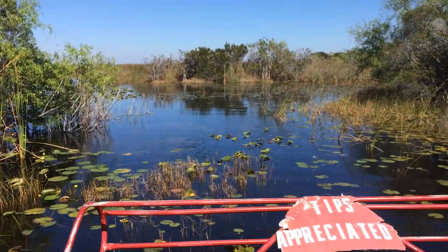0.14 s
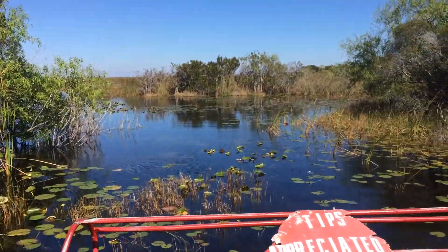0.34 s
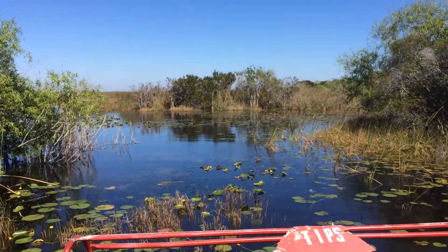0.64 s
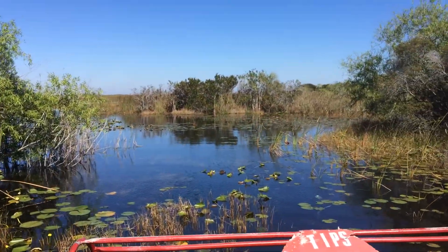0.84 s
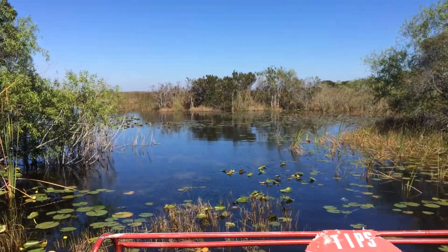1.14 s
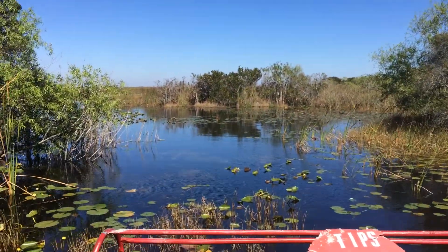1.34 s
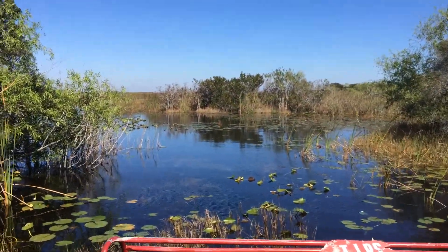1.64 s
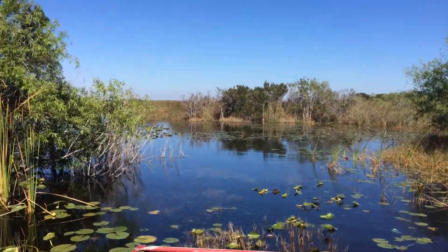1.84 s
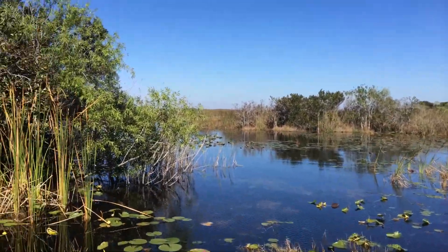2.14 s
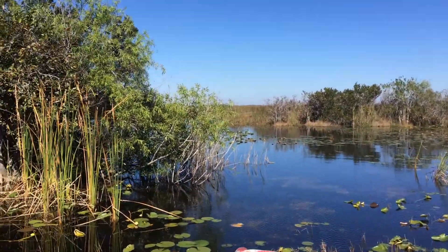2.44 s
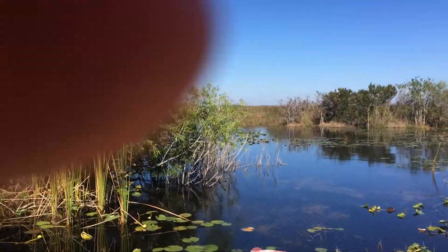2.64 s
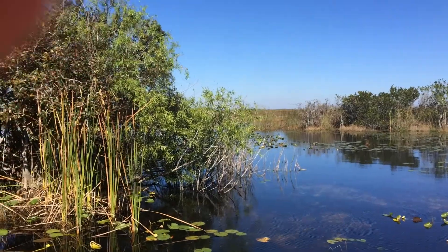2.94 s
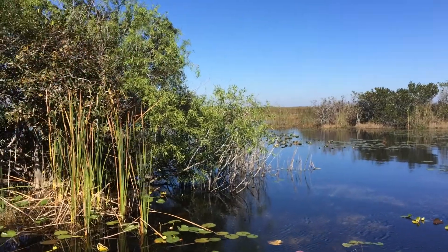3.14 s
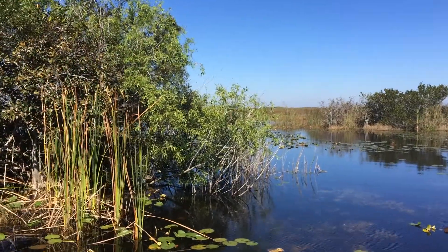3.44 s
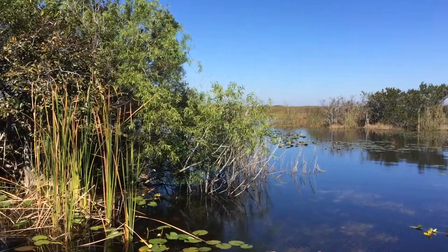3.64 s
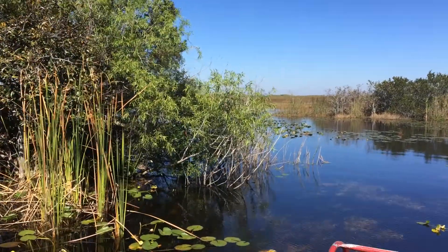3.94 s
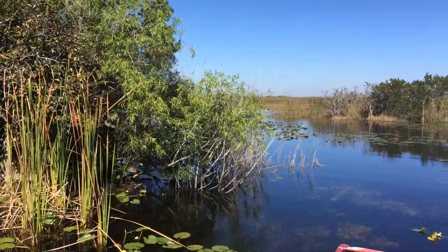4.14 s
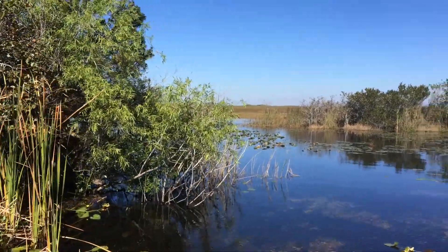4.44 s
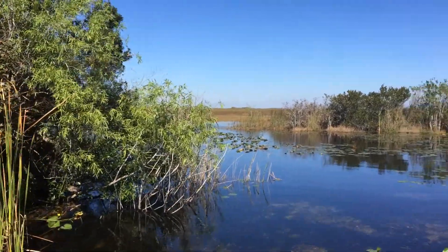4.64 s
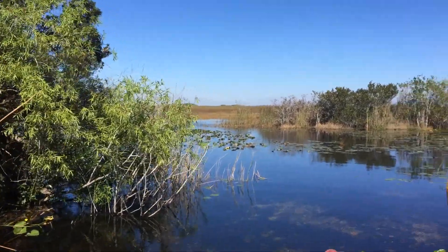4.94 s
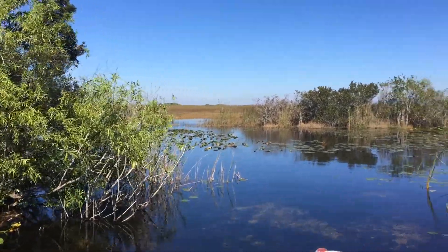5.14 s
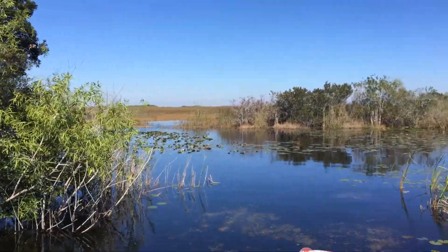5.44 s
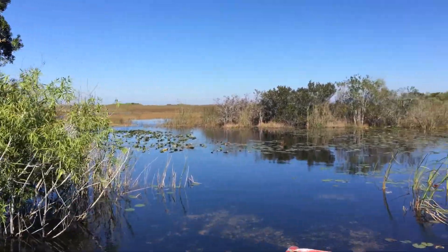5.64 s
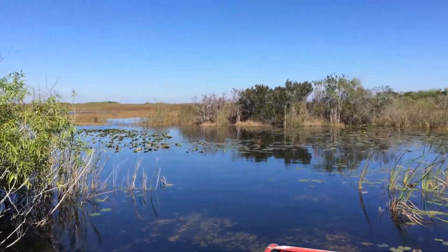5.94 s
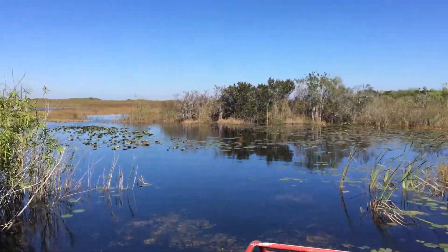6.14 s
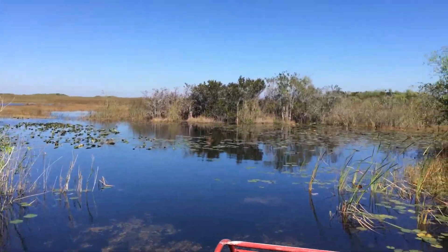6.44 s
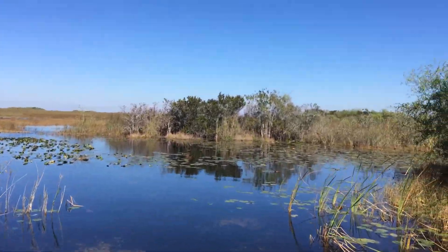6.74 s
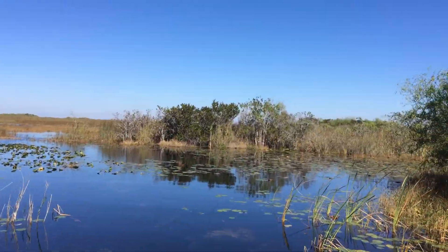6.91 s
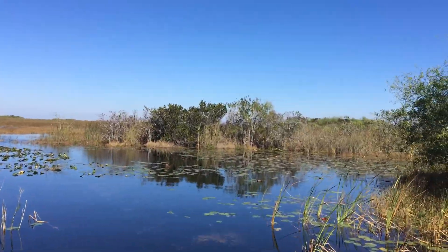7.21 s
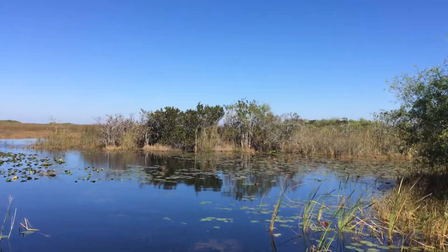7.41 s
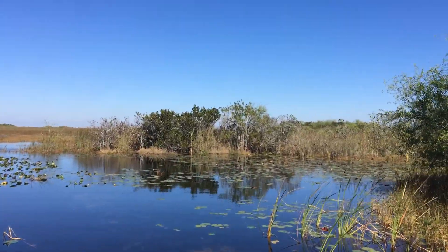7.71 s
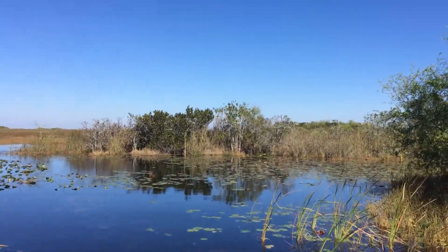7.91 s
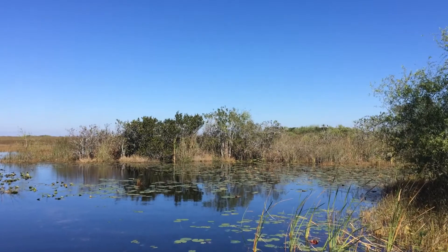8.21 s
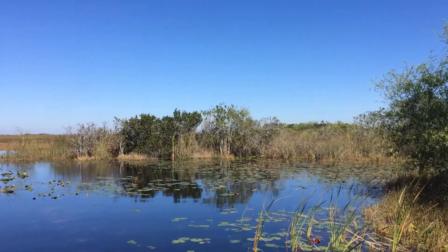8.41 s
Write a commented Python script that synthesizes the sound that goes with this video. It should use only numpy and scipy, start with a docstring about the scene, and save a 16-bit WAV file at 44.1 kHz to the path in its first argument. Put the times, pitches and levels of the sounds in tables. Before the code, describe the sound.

An airboat is heard close up from its deck. For the first two seconds the engine idles with a low, uneven rumble, burbling and putting as it slows slightly, while the metal frame clanks and rattles. At about 2.2 seconds it revs up quickly, and reeds crunch under the hull until about 3 seconds. A deep shudder swells as the propeller bites, and the sound becomes a loud, throbbing drone with rasping exhaust and a hissing wash of air. The pitch is highest from about 3.3 to 4 seconds, with a few hard exhaust pops, strongest near 3.8. The engine then eases off until about 6.6 seconds, pulls again with another low heave, and holds a fairly steady drone from 8 seconds to the end. From 5 seconds on, plants swish briefly along the hull, and the frame keeps rattling lightly.

```python
"""Airboat, from the deck

A V8 lopes at idle, revs up, eases off and pulls again. Its firings boom in the pipes, and the
exhaust gas chuffs and rasps once a turn. The two-blade propeller throbs and pushes a hissing wash
of air. The shaking metal frame clanks, most clearly at idle; reeds crunch and swish along the hull."""
import sys
import numpy as np
from scipy import signal
from scipy.fft import next_fast_len
from scipy.io import wavfile
from scipy.ndimage import uniform_filter1d

SR = 44100
rng = np.random.default_rng(int(sys.argv[2]) if len(sys.argv) > 2 else 0)


def output_pcm(signal):
    """Save a mono or channel-first signal as 16-bit PCM at the path in sys.argv[1].

    Samples are clipped to [-1, 1] before scaling.
    """
    pcm = np.clip(np.atleast_2d(signal).T, -1, 1) * 32767
    wavfile.write(sys.argv[1], SR, np.round(pcm).astype(np.int16))


N = 377937
TIME = np.arange(N) / SR

# crank speed: t/s, speed/(turns/s)
CRANK_SPEED = [(0, 16.4), (.4, 16.3), (.8, 13.25), (2.12, 12.8), (2.3, 16.5), (2.6, 20.7), (2.8, 24.74),
               (3, 28.62), (3.3, 31.47), (3.6, 30.46), (4, 30.7), (4.3, 28.76), (4.6, 28.24), (5, 25.92),
               (5.4, 23.61), (6, 21.6), (6.6, 21.3), (7.05, 23.77), (7.5, 24.4), (7.95, 26.06),
               (8.25, 25.68), (8.57, 24.9)]
# cylinder strengths in firing order: level/dB
CYLINDERS_DB = [-8, -10, -9, -10, -3.5, -8, -7.5, -8]
# drone partials ahead of the pipe EQ: multiple of crank speed, level at cruise/dB, slope/(dB/doubling)
DRONE_PARTIALS = [(2.75, -5, 0), (4.75, -5, -3), (5, -6, 19), (5.25, -7, 8), (5.5, -6, 9), (8, -2.5, 8),
                  (9, -1, 0), (10, -2, -2), (11, 0, 4), (12, 1, 5), (14, 0, 20)]
# firing notes at 6 and 7 times crank speed, at full load: t/s, sixth level/dB, seventh level/dB
FIRING_NOTES = [(2.4, -40, -42), (3.05, -31, -44), (3.35, -31, -41), (3.9, -22.5, -32), (4.3, -24.5, -35),
                (4.9, -26, -36), (5.5, -29, -31), (6.3, -35, -31), (6.8, -28, -25.5), (7.1, -27, -26.5),
                (7.35, -29, -33), (7.8, -22.5, -26), (8.57, -22, -28.5)]
# fader ride on the rasp as the throttle opens: t/s, gain/dB
RASP_RIDE = [(2.8, -1), (3.3, 0.5), (3.9, 1), (4.3, -0.5), (4.7, -1.5), (5.8, -1.5), (6.8, -1)]
# rising burbles at idle: start/s, end/s, level/dB
BURBLES = [(0.066, 0.23, -26), (0.402, 0.512, -27.5), (0.878, 1.067, -24), (1.164, 1.41, -24.5),
           (1.475, 1.584, -23.5), (1.648, 1.826, -24.5), (2.194, 2.3, -23.5)]
# throaty putts at idle: t/s, level/dB
PUTTS = [(.01, -31), (.119, -28), (.18, -30), (.24, -31), (.302, -27.5), (0.361, -29.5), (.49, -38),
         (.555, -36), (.621, -31), (1.134, -39), (1.361, -31), (2.105, -33), (2.408, -27)]
# hard exhaust pops: t/s, rough peak level/dB
POPS = [(2.25, -21), (2.288, -18), (2.969, -19), (3.236, -19), (3.273, -20), (3.332, -19), (3.694, -26),
        (3.79, -13), (3.824, -14), (4.15, -23), (4.57, -23), (4.978, -22), (6.786, -27)]
# hull heaves as the propeller bites: t/s, length/s, level/dB
HEAVES = [(2.748, 0.75, -18.5), (6.716, 0.67, -22)]
# ringing modes of the metal frame: f/Hz, level/dB, t60/s
FRAME_MODES = [(660, -3, .09), (1180, -1, .08), (1250, -6, .06), (1480, -3, .07), (1630, -3, .07),
               (1783, 0, .1), (1890, -2, .08), (2240, -6, .05), (2500, -3, .06), (2750, -6, .05),
               (3390, -4, .04), (3750, -4, .04), (4100, -3, .04), (4450, -3, .04), (4720, -5, .04),
               (5350, -10, .04)]
# frame hits: t/s, clunk level/dB, clunk f/Hz, clack level/dB, clack f/Hz, tinkle level/dB
CLANKS = [(0.119, -47, 2020, -44.0, 4100, -55), (0.298, -46.5, 1450, -53, 2990, -67),
          (0.359, -50, 1630, -47.5, 3680, -60), (0.619, -41.5, 1510, -40, 3470, -50),
          (0.654, -45.5, 1520, -51, 3280, -59), (0.724, -43.5, 1510, -44.5, 2400, -51),
          (0.794, -40.5, 1440, -40.5, 2780, -48), (0.866, -46, 1730, -46, 4650, -51),
          (0.901, -40.5, 1920, -39.5, 3330, -50.5), (1.052, -49, 1610, -50.5, 3130, -55),
          (1.13, -48, 1440, -47, 3100, -52), (1.213, -40.5, 1460, -43.5, 3590, -50),
          (1.249, -37, 1920, -34.0, 2494, -47), (1.289, -50.5, 1740, -43.5, 4540, -49.5),
          (1.362, -43, 1960, -46.5, 2980, -49.5), (1.471, -47, 1820, -42.5, 3950, -49),
          (1.506, -35, 1760, -38.5, 2580, -46), (1.611, -38.5, 1430, -34.5, 2500, -45),
          (1.654, -45, 1340, -45, 3070, -53.5), (1.802, -42.5, 1440, -36, 2535, -44.5),
          (1.838, -38.5, 1645, -40.5, 2540, -51), (1.96, -47.0, 1800, -50, 2930, -54),
          (2.078, -49, 1890, -49, 2900, -52), (2.151, -34.5, 1260, -44.5, 2960, -49),
          (2.221, -47, 1310, -38, 4730, -49), (2.256, -45, 1970, -42, 3050, -47),
          (2.285, -32, 1170, -42, 3500, -50), (2.309, -35, 1170, -47, 3630, -44.5),
          (2.362, -39, 1170, -35.5, 4660, -47), (2.444, -39, 1180, -42, 2730, -47),
          (2.517, -36.5, 1200, -45, 3030, -51), (2.565, -34.5, 1650, -42, 4350, -51),
          (2.705, -40, 1730, -47.5, 2300, -55.5), (2.744, -40, 1770, -43, 2610, -53),
          (2.843, -34, 1200, -48, 2690, -54), (2.902, -41, 1360, -42, 2280, -60),
          (3.04, -44, 1770, -46, 2450, -60), (3.128, -40, 1170, -56, 3240, -61),
          (3.178, -50, 1360, -47, 4200, -60), (3.257, -46, 1630, -46, 2480, -56),
          (3.303, -50, 1480, -43.5, 2450, -55), (3.39, -36.5, 1130, -57, 2550, -60),
          (3.432, -54, 1630, -45.5, 4180, -56), (3.56, -43.5, 1640, -45, 3670, -57),
          (3.691, -44, 1770, -42, 3570, -53), (3.824, -42, 1250, -44.5, 3410, -56),
          (4.09, -50.5, 1460, -45.5, 3500, -56.5), (4.412, -50, 1240, -46, 3870, -58.0),
          (4.642, -44.5, 1130, -43, 4080, -61), (4.884, -42.5, 1770, -46.0, 2600, -63),
          (4.944, -43, 1150, -44.5, 2590, -53), (4.999, -42.5, 1160, -45, 4370, -55),
          (5.255, -50, 1780, -48, 4260, -62), (5.426, -40.5, 1760, -46, 2420, -60),
          (5.618, -41, 1510, -42.5, 2360, -50), (5.771, -42.5, 1430, -39, 3620, -51),
          (6.024, -46, 1600, -42.5, 4530, -49.5), (6.14, -38, 1800, -40, 4200, -50),
          (6.323, -40.5, 1690, -39.5, 4300, -48.5), (6.704, -37.5, 1660, -39, 3200, -53),
          (6.821, -45, 1130, -43.5, 2580, -52), (6.884, -42, 1770, -44, 2200, -49),
          (7.322, -45, 1460, -46, 3570, -58.5), (7.38, -42.5, 1390, -43, 3900, -58),
          (7.544, -46.5, 1760, -45.5, 4000, -51), (7.707, -41.5, 1120, -42, 4100, -54),
          (7.865, -46, 1410, -45, 3800, -59.0), (8.171, -51, 1400, -42.5, 3700, -51),
          (8.328, -45, 1460, -43.5, 4080, -54), (8.485, -45.5, 1420, -45.5, 2500, -54)]
# loose tubes rubbing: centre/s, length/s, f/Hz, level/dB
RUBS = [(5.268, 0.032, 1795, -42.5), (6.82, 0.18, 1800, -44)]
# reeds crushed as the boat sets off: t/s, length/s, level/dB
CRUNCHES = [(2.186, .03, -39.5), (2.215, 0.036, -37), (2.257, 0.094, -38.5), (2.359, 0.035, -32),
            (2.414, .09, -38), (2.547, 0.055, -37), (2.6, 0.16, -44.5), (2.741, 0.055, -37.5),
            (2.793, .08, -41.5), (2.897, 0.054, -40.5)]
# spray and reeds along the hull: centre/s, length/s, level/dB
SWISHES = [(4.96, 0.12, -52), (5.452, 0.08, -48), (5.754, 0.14, -49), (6.152, 0.16, -44.5),
           (6.714, 0.14, -47), (7.096, 0.11, -45), (7.404, 0.069, -43.5), (7.728, 0.089, -43.5),
           (8.02, 0.11, -46.5), (8.36, 0.096, -47.5)]

# EQ curves of the exhaust: f/Hz, level/dB
PIPE_EQ = [(40, -30), (70, -12), (95, -4), (113, -1.5), (130, -3.5), (148, 0), (165, 0), (180, -2.5),
           (205, -13), (250, -19), (310, -24), (390, -35), (900, -70), (2500, -110)]
CHUFF_EQ = [(130, -23), (230, 0.5), (310, 0.5), (390, -13), (550, -14), (1500, -83.5)]
RASP_EQ = [(280, -21.5), (400, -2.5), (480, 3.5), (600, 9), (700, -1), (850, -17.5), (1300, -17),
           (3000, -52), (9000, -94)]
THROAT_EQ = [(50, -31), (100, 3), (150, -4.5), (200, 3), (250, 4.5), (300, -5), (380, -25), (560, -15),
             (680, -16.5), (900, -27), (2000, -60)]
# EQ curves of the air wash: f/Hz, level/dB
ROAR_EQ = [(300, 3.5), (700, 5.5), (1000, 2.5), (1180, 2), (1400, 0), (1800, -0.5), (2200, -5.5),
           (3000, -13.5), (4400, -16.5), (6000, -19.5), (12000, -20.5)]
HISS_EQ = [(1200, -6), (3000, 1), (4500, 2.5), (5500, -2), (6600, -1), (8000, -4), (11000, -7),
           (13000, -16), (15000, -22)]
FIZZ_EQ = [(4000, -44), (8000, -6), (11500, 9), (15000, -9)]
# EQ curves of a clank's low, middle and top registers: f/Hz, level/dB
CLUNK_EQ = [(300, -18), (680, 1.5), (900, -5.5), (1200, -8), (1900, -4.5), (2300, -14.5), (5000, -49.5)]
CLACK_EQ = [(1500, -25.5), (2300, -2.5), (3300, 1), (4600, -1), (5400, -8), (8000, -37)]
TINKLE_EQ = [(4000, -23.5), (5800, 2.5), (7000, 1), (9000, -6), (15000, -14.5)]
# EQ curves of the shuddering hull and the breaking reeds: f/Hz, level/dB
HULL_EQ = [(10, -60), (28, -30), (36, -16), (44, 0), (55, -3), (72, -8), (100, -8.5), (170, -40),
           (600, -100)]
REEDS_EQ = [(700, -14), (1200, -1), (1900, 1.5), (2600, -0.5), (3400, -2), (4600, 2.5), (5500, -6.5),
            (7500, -11), (14000, -26)]

IDLE, CRUISE = 13, 25  # turns/s
BITE, BITE_RANGE = 17.48, 6.6  # turns/s: load starts at BITE and is full BITE_RANGE higher
# layer gains: at cruise/dB, slope/(dB/doubling of speed), boost/(dB per unit of surge), random swing/dB
BOOM, DRONE = (-25, 9, 2.5, -0.1), (-27.5, 12, 0, .6)
CHUFF, RASP = (-35.5, 0, 0.5, 1.84), (-42.5, 18, 1, .9)
BLADES, BLADE_OCTAVE, SHUDDER = (-23.5, -5.5, 2, 3.5), (-29, 19, 1.5, 1.8), (-26.5, -5.5, 3.5, 2.5)
ROAR, HISS = (-42, 10, 2, 1.8), (-50, 6, 1, .7)
# unloaded gains: at idle/dB, slope/(dB/doubling of speed)
IDLE_BOOM, IDLE_CHUFF, IDLE_RASP, IDLE_SHUDDER = (-29, 16), (-49, 22), (-54, 23), (-26, 0)


def exhaust(speed, turn, load, surge):
    """Ragged firings boom in the pipes; load brings in a throbbing drone and two clear firing notes."""
    ragged = steadied(colour(firings(turn, evenness=0.24), PIPE_EQ), 0.051)
    doublings = np.log2(speed / CRUISE)
    drone = sum(amp(db + slope * doublings) * response(PIPE_EQ, k * speed) * tone(turn, k, waver=.15)
                for k, db, slope in DRONE_PARTIALS)
    sixth_db, seventh_db = curves(FIRING_NOTES)
    sixth = amp(sixth_db) * tone(turn, order=6, waver=.18)
    seventh = amp(seventh_db) * tone(turn, order=7, waver=.25)
    boom = ragged * blend(loping(IDLE_BOOM, speed), level(BOOM, speed, surge), load)
    return boom + load * (level(DRONE, speed, surge) * drone + sixth + seventh)


def firings(turn, evenness):
    """Four firings a turn, each cylinder with its own strength and no two burns alike."""
    stroke = np.floor(turn * 4).astype(int)
    at = np.flatnonzero(np.diff(stroke)) + 1
    burn = evenness + rng.uniform(-1.6, 1.6, N)[:len(at)]
    pulses = np.zeros(N)
    pulses[at] = amp(np.take(CYLINDERS_DB, stroke[at], mode="wrap")) * burn
    return pulses


def putter(speed, turn, load, surge):
    """The exhaust gas leaves in a low chuff and a higher rasp once a turn."""
    chuff = puffs(turn, CHUFF_EQ, sharpness=3.4 - load, bed=.15 + .3 * load, scatter_db=2.4)
    rasp_bed = np.interp(speed, (24, 30), (.36, .15))  # the puffs stand apart most at top speed
    rasp = puffs(turn, RASP_EQ, sharpness=4.2, bed=rasp_bed, scatter_db=.7)
    ride_db, = curves(RASP_RIDE)
    chuff *= blend(loping(IDLE_CHUFF, speed), level(CHUFF, speed, surge), load)
    rasp *= blend(loping(IDLE_RASP, speed), level(RASP, speed, surge), load)
    return chuff + amp(ride_db) * rasp


def puffs(turn, eq, sharpness, bed, scatter_db, likeness=.5):
    """A puff of rough gas once a turn over a steady bed, each like the last but with its own strength."""
    strength = amp(scatter_db * np.clip(rng.standard_normal(N), -2, 2))[np.round(turn).astype(int)]
    envelope = bed + strength * np.exp(sharpness * (np.cos(2 * np.pi * turn) - 1))
    grains_per_turn = 1024
    noise = rng.standard_normal((int(turn[-1]) + 1, grains_per_turn))
    eddies = signal.lfilter([1], [1, -likeness], noise, axis=0).ravel()  # each turn echoes the last
    gas = steadied(colour(eddies[(turn * grains_per_turn).astype(int)], eq), .008)
    return steadied(envelope * gas, 0.096)


def burbles(turn, from_hz=130, to_hz=157):
    """Each burble is a narrow pipe resonance that swells and climbs in pitch."""
    gas, out = colour(firings(turn, evenness=0.13), PIPE_EQ), np.zeros(N)
    for start, end, db in BURBLES:
        part = gas[(TIME > start) & (TIME < end)]
        glide_hz = np.linspace(from_hz, to_hz, len(part))
        ring = steadied(resonate(part, glide_hz, width_hz=0.58), 0.088)
        add(out, start, amp(db) * ring * signal.windows.tukey(len(part), .5))
    return out


def putts():
    """One strong burn at idle knocks the throat of the pipes."""
    t, out = np.arange(SR // 8) / SR, np.zeros(N)
    knock = colour(1. * (t == 0), THROAT_EQ)
    for start, db in PUTTS:
        add(out, start, amp(db) * knock / knock[t < .02].std())
    return out


def pops(attack_s=0.0015, t60_s=0.06, crest_db=5):
    """A harder burn barks briefly through the rasp of the pipes."""
    t, out = np.arange(SR // 8) / SR, np.zeros(N)
    envelope = np.minimum(t / attack_s, 1) * amp(-60 * t / t60_s)
    for start, db in POPS:
        gas = steadied(colour(rng.standard_normal(len(t)), RASP_EQ), 0.024)
        add(out, start, amp(db - crest_db) * envelope * gas)
    return out


def propeller(speed, turn, load, surge):
    """Under load two blades beat the air each turn, with an octave on top, over the hull's shudder."""
    shudder = steadied(colour(firings(turn, evenness=0.36), HULL_EQ), 0.061)
    beat = tone(turn, order=2, waver=.12)
    octave = level(BLADE_OCTAVE, speed, surge) * tone(turn, order=4, waver=.22)
    shudder_gain = blend(loping(IDLE_SHUDDER, speed), level(SHUDDER, speed, surge), load)
    throb = level(BLADES, speed, surge) * beat + load * octave
    return load * throb + shudder_gain * shudder + heaves(beat, shudder)


def heaves(beat, shudder, beat_share=0.73):
    """The hull heaves: blade beat and shudder well up in a deep rumble and die away."""
    rumble = beat_share * beat + (1 - beat_share) * shudder
    return rumble * bursts(HEAVES, ramp_s=0.06, decay_db=-15)


def wash(speed, turn, surge, chop=0.027):
    """Turbulent propeller air, lightly chopped by the blades; the finest fizz comes only at high speed."""
    flutter = wander(35)
    beat = 1 + chop * np.cos(2 * np.pi * 2 * turn)
    roar = unit(colour(rng.standard_normal(N) * beat, ROAR_EQ)) * level(ROAR, speed, surge)
    hiss = unit(colour(rng.standard_normal(N), HISS_EQ)) * level(HISS, speed, surge)
    fizz = unit(colour(rng.standard_normal(N), FIZZ_EQ)) * amp(-59 + 2.6 * (speed - speed.max()))
    return roar * amp(1.26 * flutter) + hiss * amp(0.36 * flutter) + fizz * beat


def rattle(load, surge, jingles_per_s=7, surge_jingles_per_s=8):
    """The shaking frame: distinct clanks, plus jingles that get louder with load and busier with surge."""
    hits = clanks(CLANKS, tube_db=-.5)
    due = np.cumsum(jingles_per_s + surge_jingles_per_s * surge) / SR
    shake_db = -52.5 + 2.5 * load + 3.5 * surge
    balance_db = np.array((-0.87, -1, -11))
    low_modes, high_modes = np.array_split(np.transpose(FRAME_MODES)[0], 2)
    jingles = []
    for k, (late, strength, low, high) in enumerate(rng.random((int(due[-1]), 4))):
        at = np.searchsorted(due, k + late)
        clunk_db, clack_db, tinkle_db = shake_db[at] + 3.6 * strength + balance_db
        clunk_hz = low_modes[int(low * len(low_modes))]
        clack_hz = high_modes[int(high * len(high_modes))]
        jingles.append((at / SR, clunk_db, clunk_hz, clack_db, clack_hz, tinkle_db))
    return hits + clanks(jingles, tube_db=-12)


def clanks(rows, tube_db, frame_db=-1, tube_width_hz=65, attack_s=.004, tinkle_attack_s=.005):
    """Loose metal chatters for an instant and rings the frame, plus two pitches of the tube it hits."""
    t, out = np.arange(SR // 5) / SR, np.zeros(N)
    clunk, clack, tinkle = [colour(1. * (t == 0), eq) for eq in (CLUNK_EQ, CLACK_EQ, TINKLE_EQ)]
    hz, db, t60 = np.transpose(FRAME_MODES)[:, :, None]
    modes = amp(db - 60 * t / t60) * np.sin(2 * np.pi * hz * t)
    decay = amp(-60 * t / .105) + amp(-8.5 - 60 * t / .5)  # a fast drop, then a shivering tail
    contact = t * np.exp(-t / attack_s)

    def through(x, ring):
        """Rings x and scales it to an rms of one over the first 30 ms."""
        x = signal.fftconvolve(x, ring)[:len(t)]
        return x / x[t < .03].std()

    for start, clunk_db, clunk_hz, clack_db, clack_hz, tinkle_db in rows:
        grit, blow = rng.standard_normal((2, len(t))) * (decay, contact)
        frame = through(blow, rng.standard_normal(len(modes)) @ modes)
        sound = amp(tinkle_db) * through(grit * (1 - np.exp(-t / tinkle_attack_s)), tinkle)
        for body, level_db, tube_hz in ((clunk, clunk_db, clunk_hz), (clack, clack_db, clack_hz)):
            tube = through(blow, np.exp(-np.pi * tube_width_hz * t) * np.sin(2 * np.pi * tube_hz * t))
            singing_db = 10 * max(np.log2(2200 / tube_hz), 0)  # long, low tubes sing more clearly
            chatter = through(grit * (1 - np.exp(-t / attack_s)), body)
            hit = chatter + amp(frame_db) * through(frame, body) + amp(tube_db + singing_db) * tube
            sound += amp(level_db) * through(hit, [1])
        add(out, start - attack_s / 2, sound)
    return out


def rubs(grain_db=3):
    """Stick and slip of loose tubes makes one resonance of the frame sing."""
    grit = rng.standard_normal(N) * amp(grain_db * wander(67))
    return sum(amp(db) * swell(centre, length) * unit(resonate(grit, np.full(N, hz), width_hz=75))
               for centre, length, hz, db in RUBS)


def crunches(grain_db=3):
    """Bundles of reed stems give way under the hull in dense, grainy bursts."""
    grit = rng.standard_normal(N) * amp(grain_db * wander(160))
    return unit(colour(grit, REEDS_EQ)) * bursts(CRUNCHES, ramp_s=.006, decay_db=-7)


def swishes(grain_db=2):
    """Short swells of grainy hiss as the hull brushes through the water plants."""
    hiss = unit(colour(rng.standard_normal(N), HISS_EQ)) * amp(grain_db * wander(90))
    return hiss * sum(amp(db) * swell(centre, length) for centre, length, db in SWISHES)


def surging(speed, lag_s=.07):
    """Surge: how fast the engine is speeding up, in doublings a second, with a short lag."""
    keep = np.exp(-1 / (lag_s * SR))
    climb = np.maximum(np.gradient(np.log2(speed)) * SR, 0)
    return signal.lfilter([1 - keep], [1, -keep], climb)


def level(law, speed, surge):
    """A layer's fader: it follows speed and surge, and swings at random."""
    cruise_db, speed_db, surge_db, swing_db = law
    return amp(cruise_db + speed_db * np.log2(speed / CRUISE) + surge_db * surge + swing_db * wander(9))


def loping(law, speed, swing_db=1.5):
    """A layer's fader at idle, where the engine runs unevenly."""
    idle_db, speed_db = law
    return amp(idle_db + speed_db * np.log2(np.minimum(speed, BITE) / IDLE) + swing_db * wander(10))


def blend(idling, pulling, load):
    """Power crossfade from the gain at idle to the gain under load."""
    return np.sqrt((1 - load) * idling ** 2 + load * pulling ** 2)


def bursts(rows, ramp_s, decay_db):
    """An envelope of gated bursts, each sagging by decay_db over its length."""
    envelope = np.zeros(N)
    for start, length, db in rows:
        age = np.clip(TIME - start, 0, length)
        gate = np.minimum(np.minimum(age, length - age) / ramp_s, 1)
        envelope += gate * amp(db + decay_db * age / length)
    return envelope


def swell(centre_s, length_s):
    """A bell-shaped envelope."""
    return np.exp(-2 * ((TIME - centre_s) / length_s) ** 2)


def tone(turn, order, waver):
    """One multiple of the crank speed, wavering a little in strength and phase."""
    drift = 1 + waver * (wander(9) + 1j * wander(9.9))
    return unit((drift * np.exp(2j * np.pi * (order * turn + rng.random()))).real)


def wander(top_hz):
    """Smooth random modulation up to top_hz, with an rms of one."""
    hz = np.geomspace(top_hz / 8, top_hz, num=24)[:, None]
    coarse = TIME[::128]
    waves = np.sin(2 * np.pi * (hz * coarse + rng.random(hz.shape)))
    return np.interp(TIME, coarse, unit(waves.sum(0)))


def resonate(x, hz, width_hz):
    """A unity-gain resonance whose centre follows the curve hz."""
    spin = np.exp(2j * np.pi * np.cumsum(hz) / SR)
    pole = np.exp(-np.pi * width_hz / SR)
    return 2 * (spin * signal.lfilter([1 - pole], [1, -pole], x / spin)).real


def colour(x, eq):
    """Runs x through a minimum-phase EQ."""
    size = next_fast_len(len(x) + SR // 8)
    log_gain = np.log(response(eq, abs(np.fft.fftfreq(size, 1 / SR))))
    transfer = np.exp(np.conj(signal.hilbert(log_gain)))
    return np.fft.ifft(np.fft.fft(x, size) * transfer).real[:len(x)]


def response(eq, hz):
    """Gain of an EQ curve at the given frequencies."""
    f, db = np.transpose(eq)
    return amp(np.interp(np.log(hz + 1), np.log(f), db))


def steadied(x, span_s):
    """A leveller: holds the rms at one over about span_s, keeping the faster beat."""
    size = int(span_s * SR) + 1
    power = uniform_filter1d(uniform_filter1d(x ** 2, size), size)
    return x / np.sqrt(abs(power) + 1e-12)


def curves(rows):
    """Each column of a timed table as an automation curve."""
    times, *columns = np.transpose(rows)
    return [np.interp(TIME, times, column) for column in columns]


def add(mix, start_s, sound):
    """Drops a sound into the mix."""
    part = mix[max(round(start_s * SR), 0):][:len(sound)]
    part += sound[:len(part)]


def amp(db):
    """Decibels to gain."""
    return 10 ** (np.asarray(db) / 20)


def unit(x):
    """Scales to an rms of one."""
    return x / np.sqrt(np.mean(x ** 2) + 1e-20)


def scene():
    """Crank speed, propeller load and surge drive engine, air and jingles; spot effects sit on cues."""
    speed, = curves(CRANK_SPEED)
    turn, surge = np.cumsum(speed) / SR, surging(speed)
    load = np.clip((speed - BITE) / BITE_RANGE, 0, 1)
    engine = exhaust(speed, turn, load, surge) + burbles(turn)
    engine += putter(speed, turn, load, surge) + putts() + pops()
    air = propeller(speed, turn, load, surge) + wash(speed, turn, surge)
    return (engine + air + swishes() + crunches() + rattle(load, surge) + rubs())[None]


def record(dry, fade_s=.004, cutoff_hz=15330):
    """Soft ends and a steep high cut."""
    ends = np.minimum(np.minimum(TIME, TIME[::-1]) / fade_s, 1)
    high_cut = signal.firwin(1023, cutoff_hz, window=("kaiser", 9), fs=SR)
    return signal.oaconvolve(dry * ends, high_cut[None], "same")


dry = scene()
out = record(dry)
output_pcm(out)
```